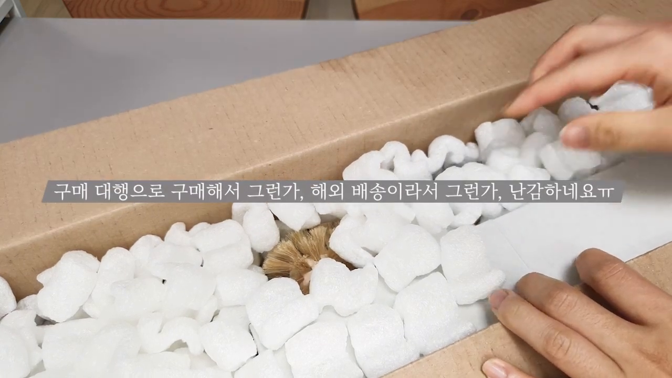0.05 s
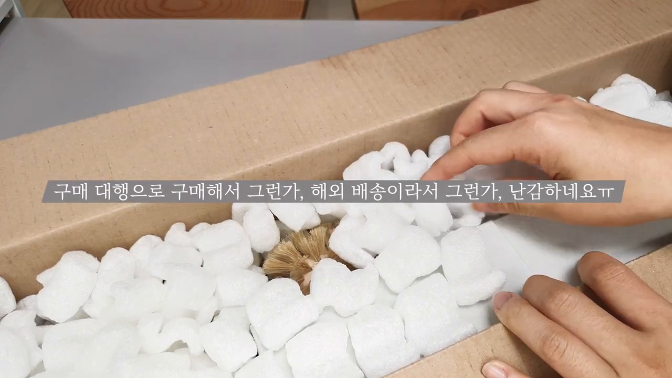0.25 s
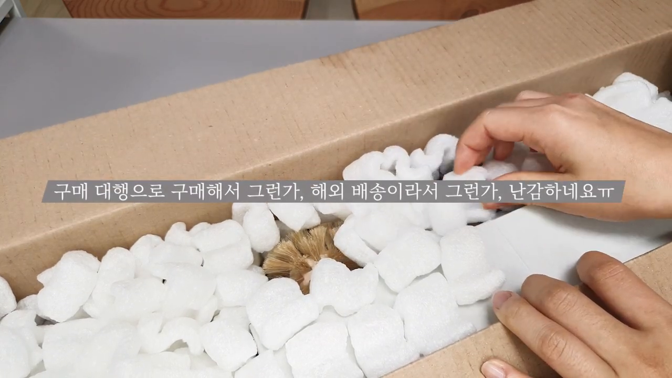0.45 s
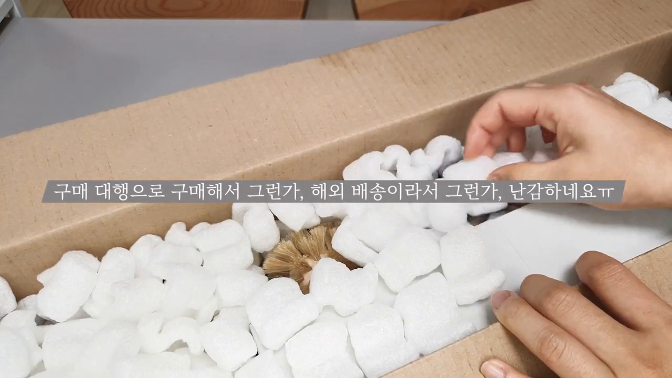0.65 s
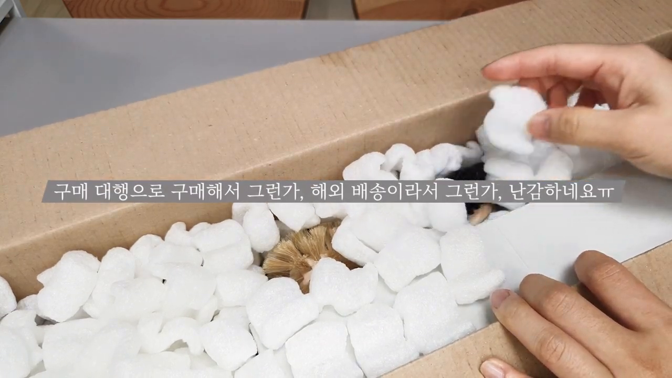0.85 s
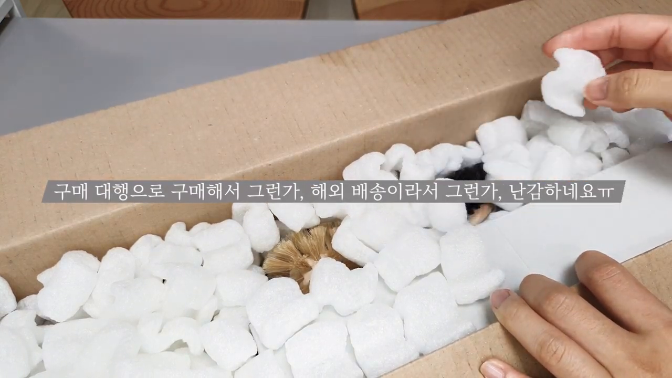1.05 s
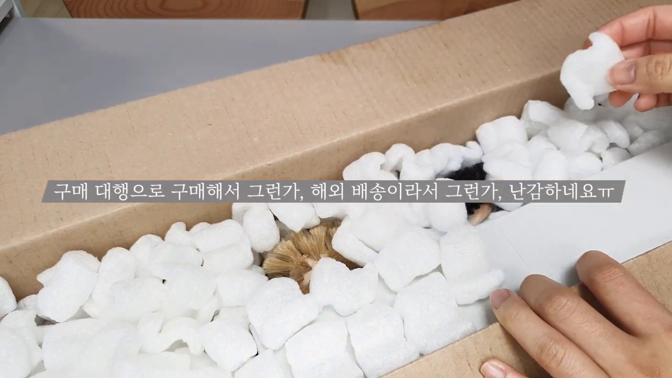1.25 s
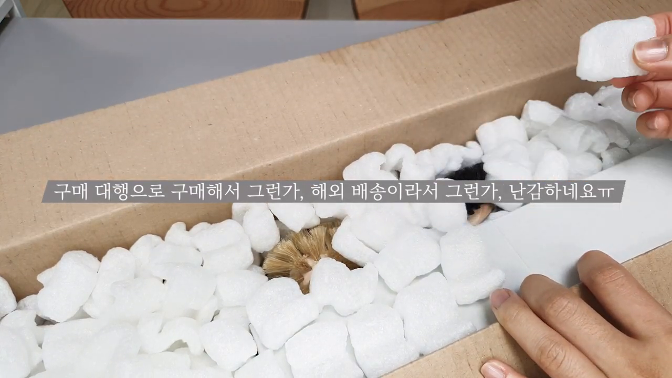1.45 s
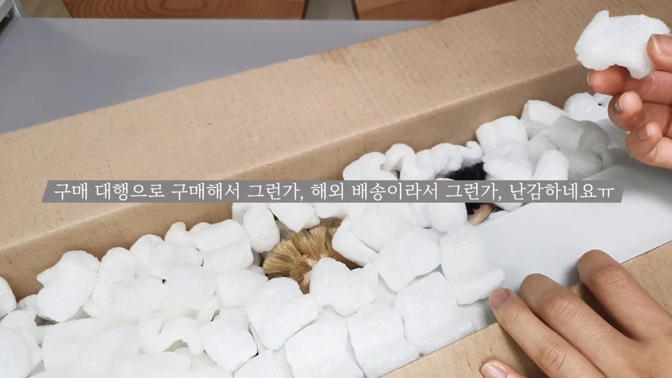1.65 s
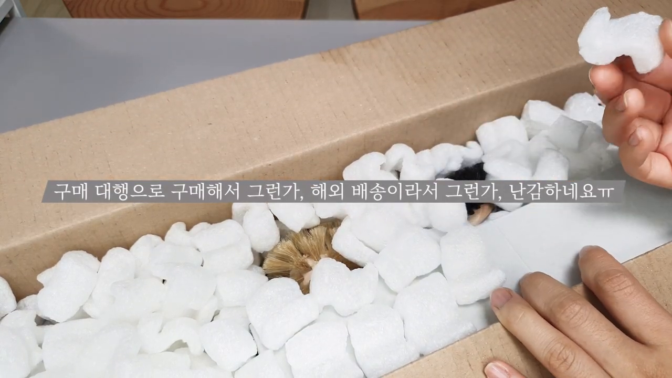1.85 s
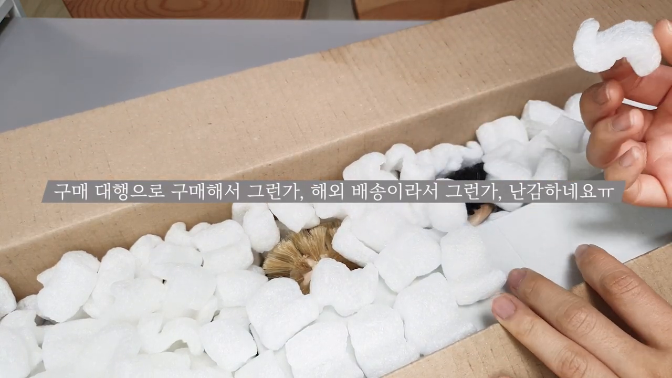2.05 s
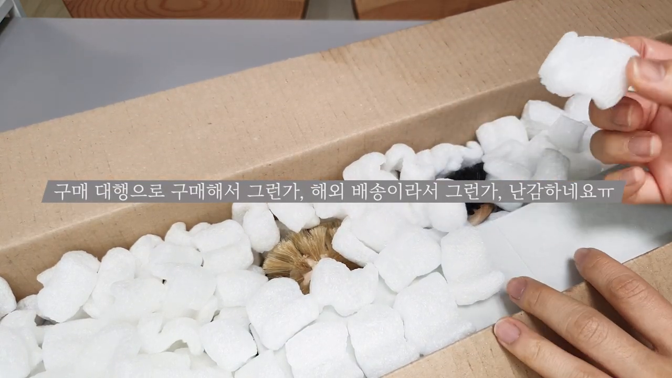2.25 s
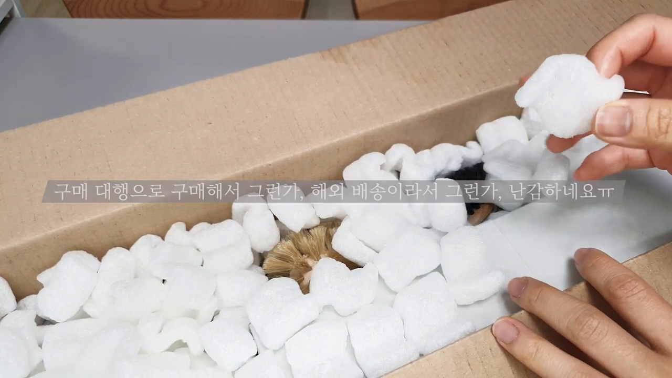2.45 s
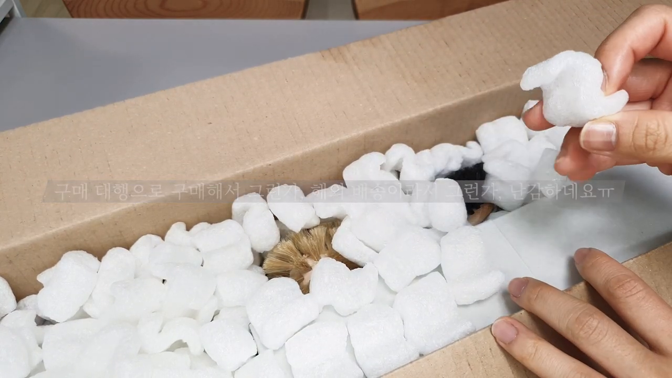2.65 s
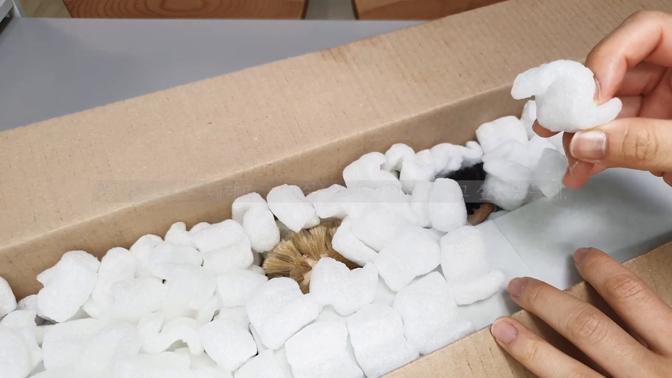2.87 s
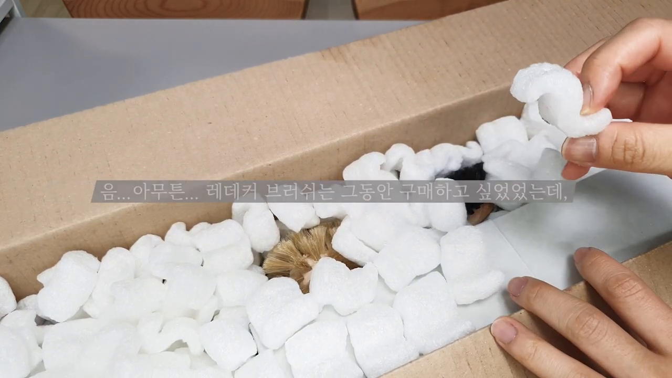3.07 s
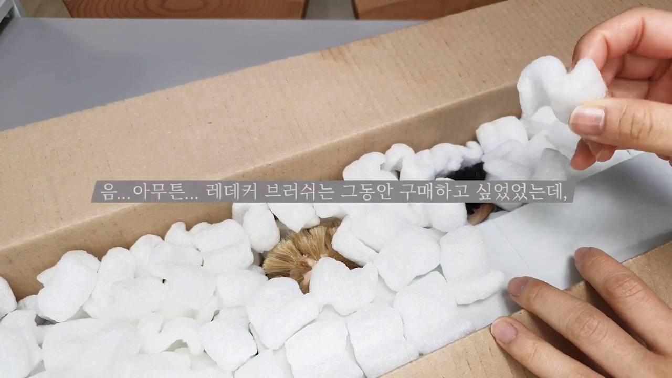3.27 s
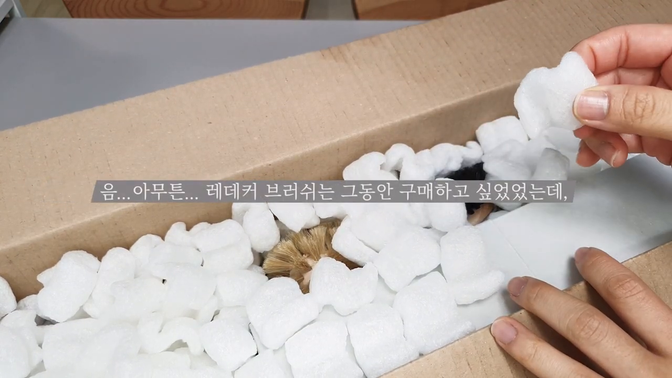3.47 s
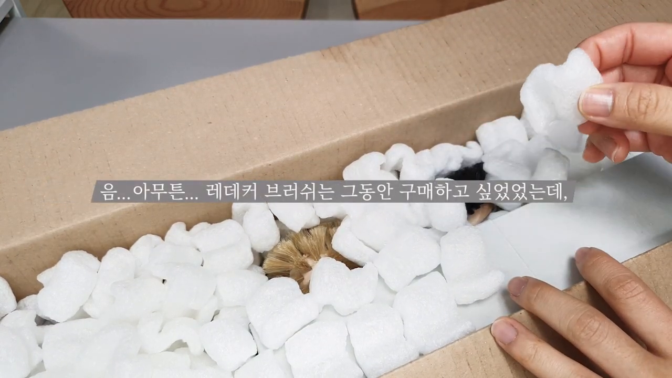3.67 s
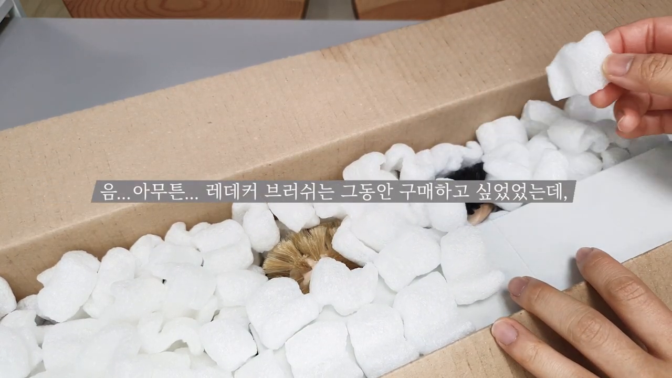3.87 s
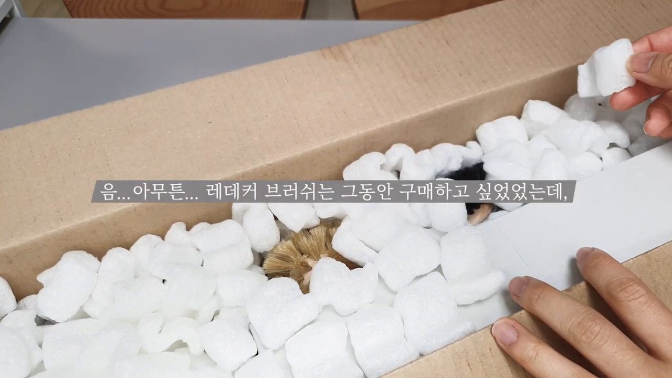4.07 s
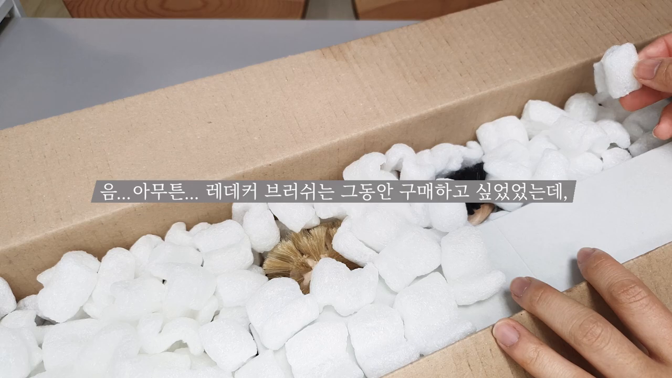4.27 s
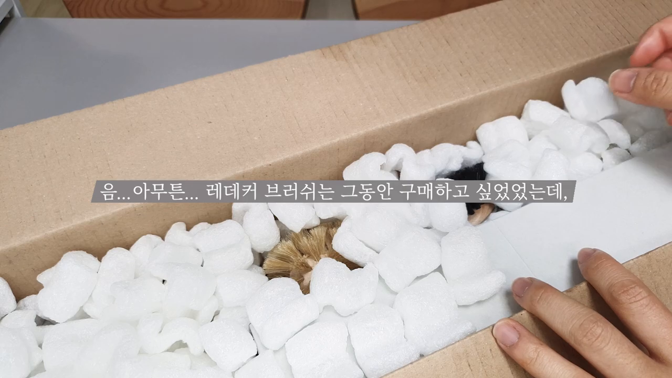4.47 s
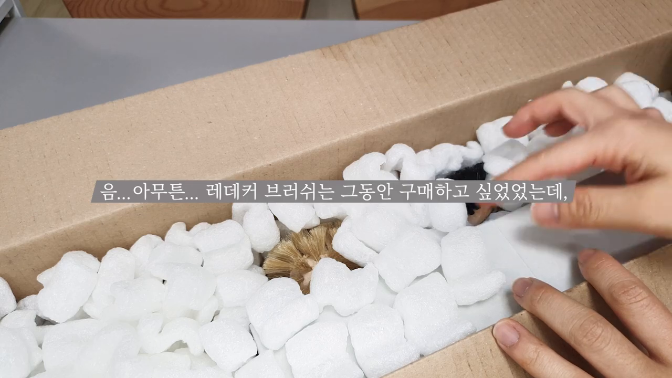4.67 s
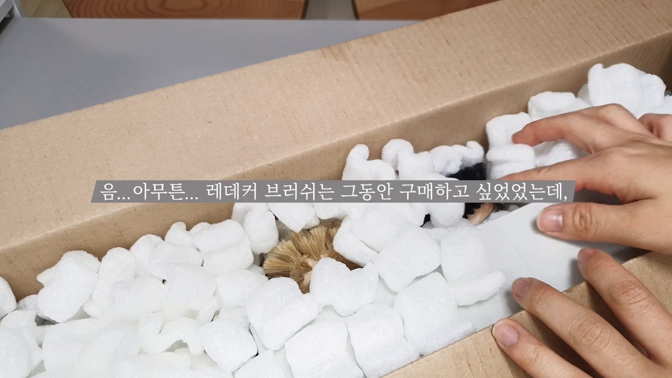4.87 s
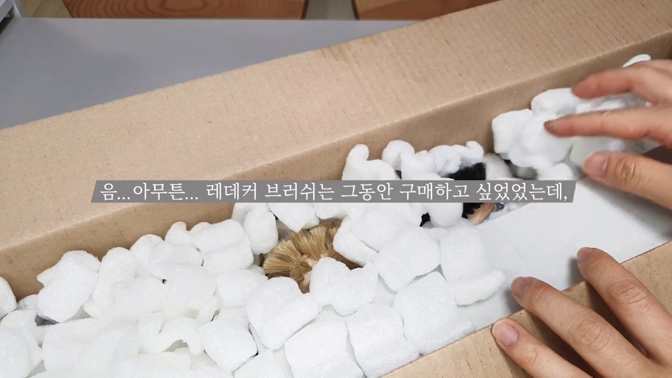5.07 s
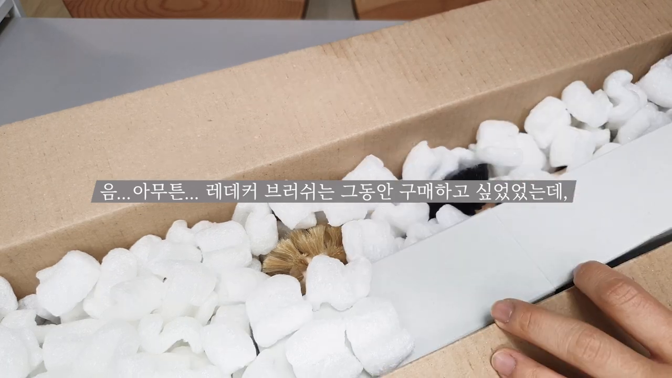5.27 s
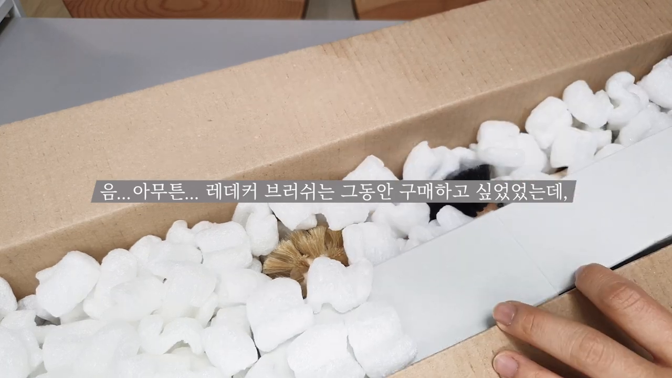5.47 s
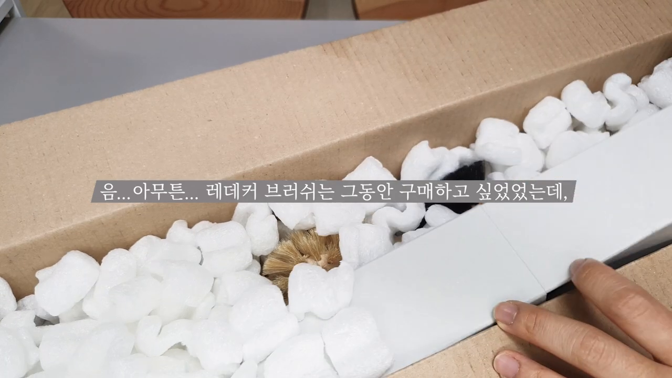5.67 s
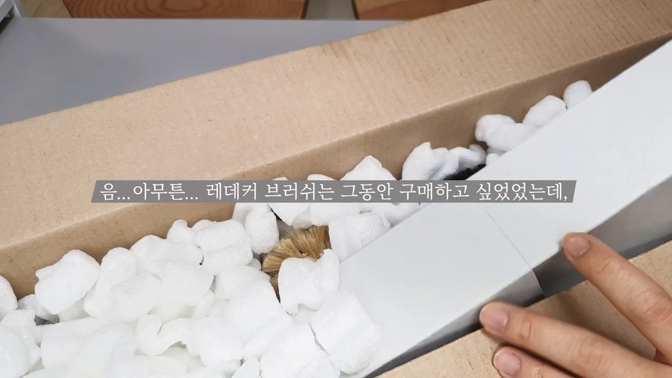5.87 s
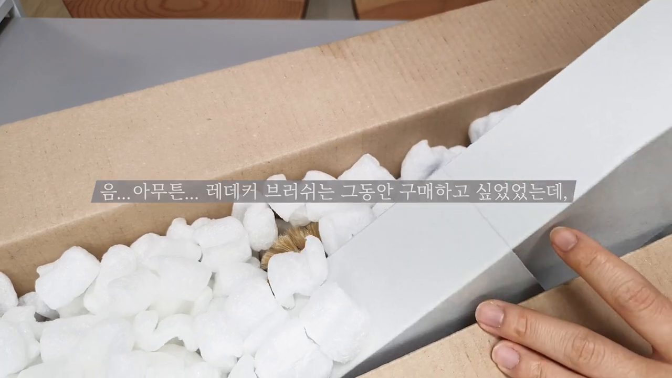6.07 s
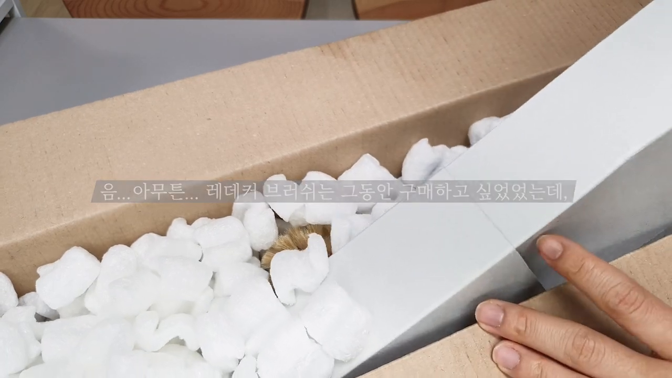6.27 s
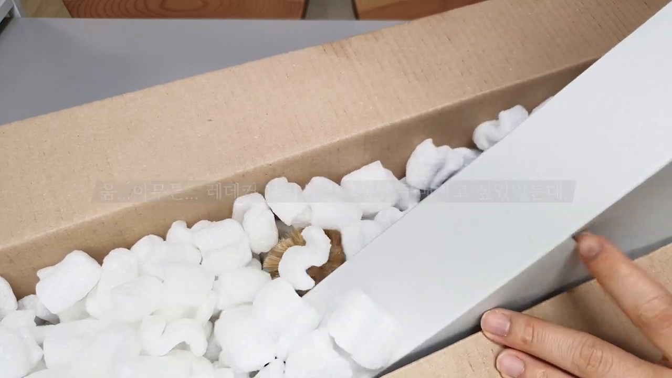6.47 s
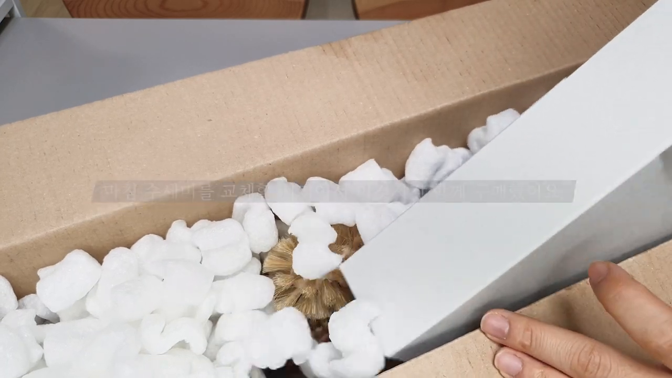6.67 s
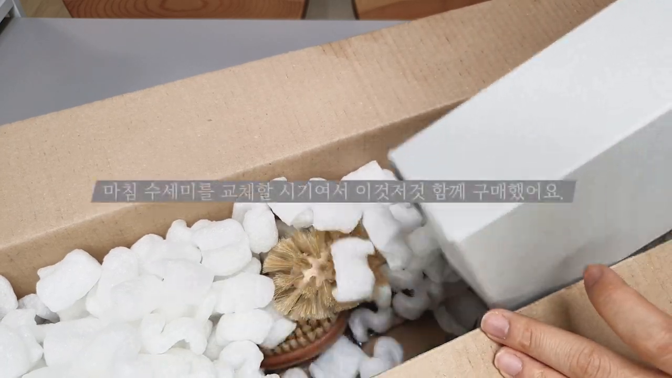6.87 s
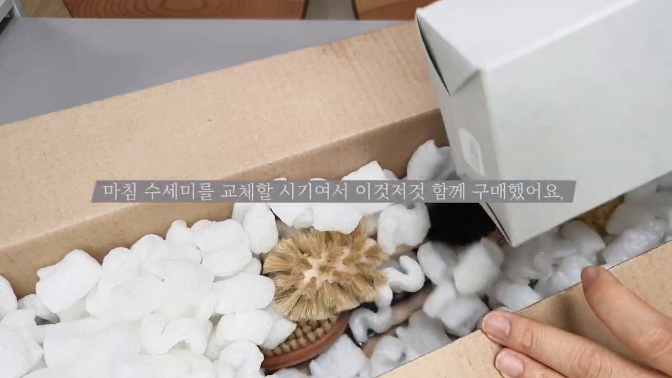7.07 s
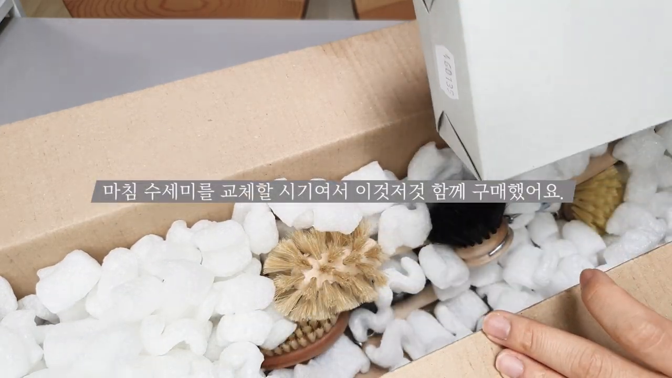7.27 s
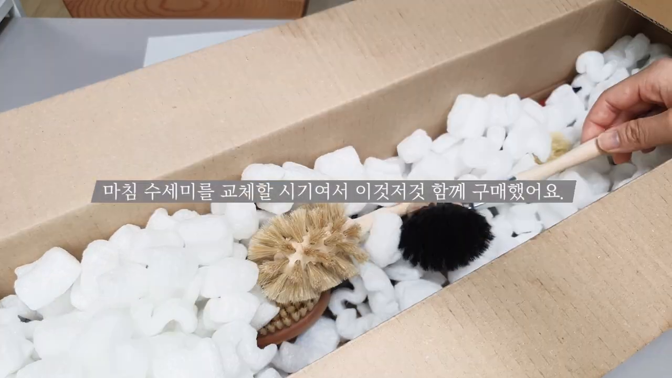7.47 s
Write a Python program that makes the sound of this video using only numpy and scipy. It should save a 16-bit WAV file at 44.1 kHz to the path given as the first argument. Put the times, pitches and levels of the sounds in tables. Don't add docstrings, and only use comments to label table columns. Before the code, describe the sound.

Close stereo pickup of unpacking indoors: a short burst of crunchy foam squeaks, then a long near-quiet passage with delicate finger rubs and isolated clicks over soft motor hum. A stronger stretch follows, with foam grinding, cardboard sliding, sharp knocks and low box thuds as a carton is pulled free. Loose light rattles and a final abrupt bump close it, with little reverberation.

```python
import sys
import numpy as np
from scipy import signal
from scipy.fft import rfft, irfft, next_fast_len
from scipy.io import wavfile
from scipy.ndimage import uniform_filter1d, map_coordinates

SR = 44100
rng = np.random.default_rng(int(sys.argv[2]) if len(sys.argv) > 2 else 0)


def amplitude_ratio(level_db):
    exponent = np.asarray(level_db, float) / 20
    return 10 ** exponent


def log_audio(samples):
    frames = np.atleast_2d(samples).T
    limited = np.clip(frames, -1, 1)
    pcm = np.round(limited * 32767).astype(np.int16)
    wavfile.write(sys.argv[1], SR, pcm)


N = 332065
T = np.arange(N) / SR


def unit(x):
    return x / np.sqrt(np.mean(x ** 2) + 1e-20)


def along(points, hz):
    f, v = np.transpose(points)
    return np.interp(np.log(hz + 1), np.log(f + 1), v)


def wobble(rate):
    return map_coordinates(rng.standard_normal(int(N * rate / SR) + 4), [T * rate])


def filtered(x, response):
    m = next_fast_len(N + SR // 2)
    return irfft(rfft(x, m) * response(np.fft.rfftfreq(m, 1 / SR)), m)[..., :N]


def coloured(spectrum):
    return lambda hz: amplitude_ratio(along(spectrum, hz))


def resonant(modes):
    def response(f):
        total = 0
        for k, (centre, width, db) in enumerate(modes):
            damping = 1j * f * width
            total = total + (-1) ** k * amplitude_ratio(db) * damping / (centre * centre - f * f + damping)
        return total
    return response


# f/Hz, left-right coherence [0 to 1]
COHERENCE = [(60, 0.8), (250, 0.87), (600, 0.37), (1500, 0.052), (4000, 0.089), (10000, 0)]


def stereo(pair, response):
    def turn(hz):
        return np.arccos(np.clip(along(COHERENCE, hz), -1, 1)) / 2
    mid, side = filtered(pair, lambda hz: response(hz) * [np.cos(turn(hz)), np.sin(turn(hz))])
    return unit(np.array([mid + side, mid - side]))


def rubbing(bed, response, per_second, centre_hz, cycles, grit):
    at = np.flatnonzero(rng.random(N) < per_second / SR * amplitude_ratio(4 * wobble(25)))
    draw = rng.standard_normal((len(at), 3))
    hz = np.clip(centre_hz * np.exp(0.404 * draw[:, :1]), centre_hz / 2, SR / 3)
    k = np.arange(int(1.9 * cycles * SR / centre_hz))
    turns = hz * k / SR
    ring = amplitude_ratio(8.5 * np.clip(draw[:, 1:2], -2, 2) - 40 * turns / cycles) * np.sin(2 * np.pi * turns)
    where = (at[:, None] + k).ravel()
    slips = []
    for gain in (np.ones(len(at)), np.tanh(draw[:, 2])):
        lane = np.bincount(where, (ring * gain[:, None]).ravel(), N + len(k))[:N]
        slips.append(unit(lane))
    return stereo(bed + grit * np.array(slips), response)


def patchy(depth_db):
    z = signal.stft(rng.standard_normal((2, N)), nperseg=512)[2]
    field = uniform_filter1d(rng.standard_normal(z.shape[1:]), size=2, axis=0)
    field = uniform_filter1d(field, size=5, axis=1)
    return unit(signal.istft(z * amplitude_ratio(depth_db * unit(field)), nperseg=512)[1][:, :N])


def strokes(rows, rise, fall, settle_db, settle_fall):
    s, hold, db = np.array(rows)[:, :3, None].transpose(1, 0, 2)
    t = T[::64]
    after = np.maximum(t - s - abs(hold), 0)
    return db - rise * np.maximum(s - t, 0) + np.maximum(-fall * after, settle_db - settle_fall * after)


def loudest(levels_db):
    return np.interp(T, T[::64], np.max(levels_db, axis=0))


def sides(pan_db):
    return amplitude_ratio(np.array([pan_db, -pan_db]) / 2)


def add(track, s, sound, pan_db=0):
    at = round(s * SR)
    for lane, late, gain in zip(track, (4, 0), sides(pan_db)):
        lane[at + late:][:len(sound)] += gain * sound


def knocks(rows, lift_db, puff_db, cycles):
    out, t = np.zeros((2, N + SR)), np.arange(SR // 8) / SR
    for s, db, hz, t60 in rows:
        band = signal.butter(2, [1.2 * hz / SR, 5 * hz / SR], 'band')
        puff = unit(signal.lfilter(*band, rng.standard_normal(len(t))))
        tone = np.sin(2 * np.pi * hz * t) + amplitude_ratio(puff_db) * puff
        onset = 1 - np.exp(-t * hz / cycles)
        add(out, s, amplitude_ratio(db + lift_db - 60 * t / max(t60, .005)) * onset * tone)
    return out[:, :N]


# multiple of the shaft rate, level/dB rms
MOTOR_ORDERS = [(1, -63), (4, -76), (5, -76.5), (10, -84.5)]
# f/Hz, level/dB rms
MAINS_LINES = [(120, -75.5), (360, -80.5), (513, -82.5), (900, -86.5)]
# f/Hz, level/dB per Hz
AIR_SPECTRUM = [(13, -65), (22, 12), (49, -5), (87, -2.5), (407, -9.5), (766, -25), (903, -27), (1400, -31),
                (2720, -22.5), (3880, -28), (8390, -31.5), (9370, -45), (15800, -37)]


def appliance():
    shaft_hz = 40.9 * (1 + 0.0023 * wobble(1.895))
    turns = np.cumsum(shaft_hz) / SR
    motor = sum(amplitude_ratio(db + 4.5) * np.sin(2 * np.pi * (k * turns + rng.random())) for k, db in MOTOR_ORDERS)
    mains = sum(amplitude_ratio(db + 3.5) * np.sin(2 * np.pi * (hz * T + rng.random())) for hz, db in MAINS_LINES)
    air = amplitude_ratio(-64) * stereo(rng.standard_normal((2, N)), coloured(AIR_SPECTRUM))
    return amplitude_ratio(2.2 * wobble(3.0)) * motor + amplitude_ratio(1.4 * wobble(1.84)) * mains + air


# t/s, hold/s, level/dB
SLEEVE_BRUSHES = [
    (0, 0.024, -52.5),
    (1.47, 0.22, -60.5),
    (2.15, 0.2, -62.5),
    (4.5, 0.05, -63.5),
    (5.22, 0.087, -54.5),
    (7.51, .03, -63),
]
# f/Hz, level/dB per Hz
SLEEVE_SPECTRUM = [(150, 5), (350, 5), (700, -2), (1500, -5), (2500, -25.5)]


def sleeve(smooth):
    brush = strokes(SLEEVE_BRUSHES, rise=205, fall=118, settle_db=-3.5, settle_fall=31)
    level_db = np.maximum(loudest(brush), -69)
    return amplitude_ratio(level_db) * stereo(np.flip(smooth, 1), coloured(SLEEVE_SPECTRUM))


# t/s, hold/s, level/dB
FOREARM_JOLTS = [
    (.86, 0.067, -56),
    (4.6, 0.041, -64.5),
    (4.9, 0.045, -52.5),
    (5.21, 0.019, -51.5),
    (5.69, 0.025, -52.5),
    (6.52, 0.24, -61.5),
    (7.51, .03, -54),
]
# f/Hz, width/Hz, level/dB
TABLE_MODES = [(68.3, 27, -0.5), (83.3, 26, 0.5)]


def table():
    jolt = strokes(FOREARM_JOLTS, rise=252, fall=148, settle_db=-13, settle_fall=13)
    level_db = np.maximum(loudest(jolt), -74)
    modes = resonant(TABLE_MODES)
    return amplitude_ratio(level_db) * stereo(rng.standard_normal((2, N)), lambda hz: modes(hz) ** 2)


# f/Hz, width/Hz, level/dB
FADING_MODES = [(2600, 520, 0)]


def fading_band(rough, settle_db):
    return amplitude_ratio(settle_db) * stereo(rough, resonant(FADING_MODES))


# t/s, level/dB peak, f/Hz, t60/s
BOX_BUMPS = [(.02, -47.5, 150, 0.096), (1.06, -48, 330, 0.028), (2.131, -44, 150, 0.045),
             (4.887, -38.5, 101, 0.086), (4.897, -42.5, 282, 0.11), (5.473, -37.5, 255, 0.057),
             (5.625, -45, 280, 0.077), (5.675, -24, 111, 0.048), (5.675, -34, 143, 0.043),
             (5.982, -25.5, 1460, 0.018), (6.06, -34.5, 308, 0.022), (6.128, -30, 241, 0.038),
             (6.49, -50, 373, 0.11), (6.612, -36, 333, 0.073), (6.666, -35, 342, 0.052),
             (6.63, -46.5, 151, 0.15), (6.93, -44, 150, 0.15), (7.005, -39, 134, 0.097),
             (7.246, -39, 189, 0.072), (7.5068, -31, 240, 0.03), (7.51, -29, 185, 0.15),
             (7.5105, -29, 287, 0.085), (7.514, -24, 75, 0.099), (7.5185, -23.5, 160, .05),
             (7.512, -37, 396, 0.064)]


def bumps():
    return knocks(BOX_BUMPS, lift_db=3.5, puff_db=-7.0, cycles=0.41)


# t/s, hold/s, effort level/dB
HAND_DIGS = [
    (.414, 0.083, -53.5),
    (.49, 0.16, -49.5),
    (.688, 0.012, -43),
    (.73, 0.12, -50.5),
    (.865, 0.03, -50.5),
    (1.012, 0.044, -57.5),
    (1.47, 0.14, -64),
]


def digging():
    return strokes(HAND_DIGS, rise=1801.5, fall=500, settle_db=-4, settle_fall=118)


# f/Hz, width/Hz, level/dB
FOAM_MODES = [(1600, 950, -12.5), (2750, 710, -3), (3570, 720, -1.5), (4290, 1060, -3), (5690, 1730, -9)]


def foam(level_db, jerk, rough):
    modes = resonant(FOAM_MODES)
    rub = amplitude_ratio(level_db + jerk) * rubbing(rough, modes, 700, 2955, cycles=24, grit=0.22)
    bursts = amplitude_ratio(level_db - 12) * rubbing(0, modes, 260, 3440, cycles=1.8, grit=1)
    return rub + bursts


# f/Hz, level/dB per Hz
SKIN_SPECTRUM = [(2500, -40), (5000, -8.5), (6800, -6), (8400, -9.5), (9300, -18.5), (12000, -15),
                 (15500, -18)]


def skin(level_db, jerk, smooth):
    flutter = 1.2 * jerk + 0.94 * wobble(90)
    rub = rubbing(smooth, coloured(SKIN_SPECTRUM), 1000, 7300, cycles=4.6, grit=0.36)
    return amplitude_ratio(level_db + flutter) * rub


# f/Hz, width/Hz, level/dB
CARD_MODES = [(546, 475, -0.5), (1250, 123, 3.5), (1500, 370, -2.5)]


def card(level_db, jerk, rough):
    rub = rubbing(np.flip(rough, 1), resonant(CARD_MODES), 200, 1060, cycles=4.4, grit=0.093)
    return amplitude_ratio(level_db + jerk) * rub


# f/Hz, width/Hz, level/dB
BOX_MODES = [(150, 59, -0.5), (280, 140, 2.5), (415, 234, 1)]


def box(level_db, smooth):
    return amplitude_ratio(level_db) * stereo(smooth, resonant(BOX_MODES))


# t/s, level/dB peak, f/Hz, left-right level/dB
FOAM_SLIPS = [(0.4233, -47.5, 5140, 11), (0.546, -44, 3040, 9), (0.479, -39.5, 2910, 3),
              (0.608, -56, 11000, 5), (0.617, -49, 3600, 1), (0.669, -39, 1780, -3),
              (0.669, -33, 5960, 3), (0.6816, -36.5, 2470, 3), (0.6826, -42, 5000, 2),
              (0.692, -34, 3470, 4), (0.695, -38.5, 2000, 1), (0.707, -37.5, 3450, 1),
              (0.724, -42, 2500, 5), (0.804, -47, 3300, 6), (0.819, -44.5, 7140, 12),
              (0.8879, -59, 2570, -1.5), (0.889, -50, 6000, 7), (0.9426, -60, 8900, 3),
              (1.014, -56, 3000, 16), (1.0624, -46, 7000, 2), (1.1057, -71, 11000, 0),
              (1.2835, -50, 2880, 5), (1.3, -48, 3300, 5), (1.306, -52, 2920, 3), (1.573, -54, 5500, 5),
              (1.394, -63, 3050, 5), (1.716, -60, 2470, -14), (2.475, -79, 9000, 1),
              (2.5412, -43, 3520, 12), (2.545, -38.5, 3330, -14), (2.5516, -33.5, 3550, 5),
              (2.555, -34.5, 3270, 1), (2.74, -54, 3840, -2), (2.891, -52, 2660, 8),
              (3.269, -40.5, 2750, -2), (3.366, -53, 2700, 1), (3.386, -53, 7640, 1),
              (3.875, -46, 2800, 12), (3.881, -45, 4150, 7), (4.4072, -63, 2970, 12),
              (4.5185, -62, 5400, 8), (4.788, -57.5, 2760, 9),
              (4.8853, -55, 1900, 0), (4.898, -50, 2860, 6), (4.9434, -39.5, 4800, 6),
                (4.95, -41, 2830, 3.5), (4.997, -49, 1840, -2), (5.061, -39, 3130, 2),
                (5.107, -34.5, 3260, 2), (5.9325, -34, 1530, -2), (5.94, -36, 3270, 3),
                (5.9328, -36, 3700, 10), (6.004, -37, 4600, 13), (5.974, -27.5, 3170, 6.5),
                (5.981, -32, 3100, 6), (6.172, -50.5, 4800, 16), (6.929, -49, 2920, 13),
                (6.9917, -44, 7000, 5), (7.008, -39, 2460, -13), (7.0465, -51.5, 6760, 15),
                (7.154, -54, 5500, 12), (7.193, -57, 3030, 3), (7.205, -57, 2220, -2),
                (7.223, -47, 4600, 13.5), (7.24, -49, 1610, 19), (7.28, -54, 3000, 2),
                (7.297, -50, 2500, 0), (7.292, -50.5, 2930, 16), (7.3183, -50, 2430, 10),
                (7.367, -59, 2550, 19)]


def ticks():
    ring, crack, spit = np.zeros((3, 2, N + SR))
    t = np.arange(SR // 50) / SR
    ring_s, crack_s = .007, .009
    onset = 1 - np.exp(-t / 0.00047)
    for s, db, hz, pan_db in FOAM_SLIPS:
        noise = rng.standard_normal((2, len(t)))
        spit_db = -36.5 + 0.59 * (db + 38.0) + 7.5 * np.log2(hz / 3000)
        add(ring, s, amplitude_ratio(db + 11.5 - 60 * t / ring_s) * onset * np.sin(2 * np.pi * hz * t), pan_db)
        add(crack, s, amplitude_ratio(db + 13.5 - 60 * t / crack_s) * noise[0], pan_db)
        add(spit, s, amplitude_ratio(spit_db - 60 * t / crack_s) * noise[1], pan_db)
    cracks = filtered(crack[:, :N], resonant(FOAM_MODES))
    return ring[:, :N] + cracks + filtered(spit[:, :N], coloured(SKIN_SPECTRUM))


# t/s, level/dB peak, f/Hz
CARD_TAPS = [(0.425, -40, 1350), (0.684, -46, 890), (0.697, -42, 1280), (0.865, -39, 1250),
             (0.924, -41.5, 420), (1.012, -47, 790), (1.283, -45, 1700), (2.129, -38.5, 1050),
             (2.13, -41.5, 2060), (2.1305, -46, 538), (3.876, -38, 1600), (4.517, -50, 910),
             (4.886, -39, 472), (4.8975, -36.5, 496), (5.032, -29, 570), (5.474, -36.5, 438),
             (5.624, -41, 465), (5.674, -31.5, 1100), (5.974, -23.5, 492), (5.982, -22.5, 569),
             (6.126, -38, 636), (6.487, -38, 520), (6.612, -39, 690), (6.783, -28.5, 664),
             (6.881, -26, 1150), (6.958, -28.5, 685), (7.152, -41, 1600), (7.171, -29, 1690),
             (7.243, -19.5, 687), (7.244, -26, 1500), (7.293, -32.5, 717), (7.341, -38, 1650),
             (7.363, -40.5, 707), (7.511, -25, 540), (7.512, -42, 845), (7.516, -27, 554),
             (7.524, -26, 503),
             (7.154, -42.5, 690), (7.188, -44, 1600), (7.194, -40.5, 694), (7.2385, -43, 1350),
                 (7.248, -31, 750), (7.257, -39, 687), (7.257, -49, 1530), (7.263, -42, 507),
                 (7.279, -36, 710), (7.305, -49, 704), (7.35, -46, 402), (7.41, -49.5, 1000)]


def taps():
    rows = []
    for s, db, hz in CARD_TAPS:
        t60 = 0.021 * (1000 / hz) ** 0.78
        rows.append((s, db, hz, t60))
    return knocks(rows, lift_db=-1.0, puff_db=-12, cycles=1.0)


# t/s, length/s, level/dB, f/Hz
FRICTION_STREAKS = [(0.425, 0.045, -64, 1470), (.477, 0.037, -56, 1470), (0.681, 0.018, -54, 1510),
                    (0.485, 0.022, -56, 3500), (.533, 0.029, -64, 6940), (.533, .024, -68, 5800),
                    (0.557, 0.071, -60, 1540), (.604, .016, -60, 6700), (0.683, 0.028, -52, 2580),
                    (0.686, 0.023, -56, 3440), (0.672, 0.028, -49, 6540), (3.875, 0.064, -71, 1600),
                    (3.876, .025, -57.5, 2750), (4.018, .025, -68.5, 3700), (4.052, 0.028, -77, 1720),
                    (4.045, .03, -72, 2870), (4.994, 0.027, -61, 1870), (5.11, 0.055, -56, 1680),
                    (5.133, 0.019, -51.5, 3050), (5.167, 0.041, -72, 1400), (5.244, .045, -65, 1500),
                    (5.259, 0.053, -58.5, 905), (5.375, 0.029, -52.5, 394), (5.378, 0.043, -61.5, 1960),
                    (5.437, .02, -68, 1750), (5.53, 0.027, -64, 2350), (5.63, 0.038, -61.5, 1500),
                    (5.75, 0.049, -55.5, 1050), (5.77, .09, -56, 2900), (5.86, 0.07, -53.5, 1440),
                    (5.945, 0.096, -53, 557), (5.993, 0.042, -52, 1350), (6.485, 0.023, -56, 1520),
                    (6.489, 0.027, -57, 475), (6.544, 0.024, -59, 1250), (6.559, 0.029, -58, 2900),
                    (6.62, 0.026, -56, 1290), (6.645, .024, -54, 1350), (6.646, .03, -51.5, 2600),
                    (6.657, 0.029, -61, 4870), (6.692, 0.05, -61.5, 1200), (6.737, 0.049, -52, 645),
                    (6.754, 0.042, -56, 1830), (6.75, .05, -57, 3600), (6.781, 0.045, -54, 2880),
                    (6.813, 0.078, -60, 2630), (6.82, .06, -56, 3300), (6.897, 0.014, -48.5, 686),
                    (6.94, 0.051, -54, 690), (7.002, .028, -53.5, 2420),
                    (1.281, .01, -54.5, 3540), (1.28, .01, -57, 6840), (1.279, 0.0097, -62.5, 1680),
                (1.464, 0.047, -67.5, 1750), (1.589, 0.037, -67, 1600), (1.61, .045, -65, 2190),
                (1.76, 0.21, -79, 1320), (2.528, .012, -48, 3520), (2.67, .035, -76, 1390),
                (2.736, .045, -64, 3770), (2.83, .02, -70, 2230), (2.829, .015, -62, 3800),
                (2.872, .03, -62.5, 2700)]


def streaks():
    out = np.zeros((2, N + SR))
    for s, length, db, hz in FRICTION_STREAKS:
        u = np.arange(round(length * SR)) / (length * SR)
        width_hz = 260 * (hz / 1000) ** 0.39
        peak = signal.iirpeak(hz, hz / width_hz, SR)
        once = signal.lfilter(*peak, rng.standard_normal(SR // 4))
        band = signal.lfilter(*peak, once)[-len(u):]
        swell = np.sqrt(np.minimum(4 * np.minimum(u, 1 - u), 1))
        add(out, s, amplitude_ratio(db + 4.0) * swell * unit(band))
    return out[:, :N]


# t/s, length/s, level/dB, f/Hz
PITCHED_SQUEAKS = [(0.471, 0.044, -59.5, 1120), (2.282, 0.11, -72.5, 1944), (3.886, 0.075, -61, 2900),
                   (4.025, 0.067, -81, 1734), (5.26, 0.066, -59.5, 1402), (5.517, 0.062, -57, 3150),
                   (5.53, .045, -65, 3600), (5.926, 0.055, -50.5, 1500), (5.929, 0.086, -47, 3210),
                   (5.93, 0.08, -44.5, 4270), (6.82, 0.092, -59.5, 1250), (6.989, 0.033, -59, 2400)]


def squeaks():
    out = np.zeros((2, N + SR))
    for s, length, db, hz in PITCHED_SQUEAKS:
        u = np.arange(round(length * SR)) / (length * SR)
        drift, grip = uniform_filter1d(rng.standard_normal((2, SR // 4)), size=60, axis=1)[:, :len(u)]
        tone = np.sin(2 * np.pi * np.cumsum(hz * (1 + 0.487 * drift)) / SR)
        shape = np.minimum(8 * u, 1) * np.sqrt(1 - u)
        add(out, s, amplitude_ratio(db + 9 + 17 * grip) * shape * tone)
    return out[:, :N]


# t/s, hold/s, squeak level/dB, skin over squeak/dB
PEANUT_CATCHES = [(1.278, 0.009, -56.5, 0.5), (1.395, 0.0082, -59.5, 0), (1.714, 0.0058, -57.5, -3.5),
                  (1.792, 0.0091, -63.5, -6), (1.88, 0.0087, -64, -6), (2.003, 0.0076, -63.5, -3),
                  (2.068, 0.025, -66, -8), (2.238, 0.091, -67, 0), (2.53, 0.012, -51.5, -7),
                  (2.542, 0.013, -53, -4), (2.733, 0.059, -61.5, -1.5), (2.812, 0.026, -59, -0.5),
                  (2.866, 0.032, -62.5, -4), (3.008, .006, -68.5, 0), (3.026, 0.007, -62.5, -1),
                  (3.263, 0.0064, -68, -6), (3.39, 0.032, -63.5, -1.5), (3.875, 0.062, -58.5, -8.5),
                  (4.018, 0.055, -69.5, -2.5), (4.277, 0.014, -67, 6), (4.407, .008, -72, 6.5),
                  (4.518, 0.018, -66.5, -0.5), (4.788, 0.0047, -69, 2.5)]
# t/s, hold/s, squeak level/dB, skin over squeak/dB
FINGER_RUBS = [
    (1.633, 0.13, -65, -5),
    (2.288, 0.029, -62, 7.5),
    (2.93, 0.27, -73, 1),
    (3.316, 0.12, -70, 1),
    (3.467, 0.11, -73.5, 3.5),
    (3.625, 0.029, -67, -3),
    (4.138, 0.049, -78, 4),
    (6.942, 0.06, -63.5, 14.5),
]


def fingering():
    catches = strokes(PEANUT_CATCHES, rise=2500, fall=412, settle_db=-12, settle_fall=52)
    rubs = strokes(FINGER_RUBS, rise=259, fall=200, settle_db=-20, settle_fall=100)
    held = np.r_[catches, rubs]
    skin_over = np.array(PEANUT_CATCHES + FINGER_RUBS)[:, 3:]
    return loudest(held), loudest(held + skin_over)


# f/Hz, width/Hz, level/dB
PEANUT_MODES = [(1550, 1000, -5), (2910, 510, 3.5), (3660, 710, -3), (5280, 710, -0.5)]


def held_peanut(level_db, jerk, smooth):
    return amplitude_ratio(level_db + jerk) * stereo(smooth, resonant(PEANUT_MODES))


# t/s, hold/s, effort level/dB, card pressure over effort/dB
CARTON_DRAGS = [(4.906, 0.0059, -61, -2.5), (4.953, .04, -49, 0), (4.998, 0.15, -46.5, 0.5),
                (5.17, 0.1, -59, 6), (5.265, 0.065, -54, 6.5), (5.337, 0.026, -58.5, 5),
                (5.378, 0.095, -58, 7.5), (5.497, 0.022, -59.5, 7), (5.53, 0.043, -51.5, -1.5),
                (5.585, 0.035, -59.5, 1), (5.635, 0.22, -60.5, 9.5), (5.731, .03, -53.5, 9.5),
                (5.766, 0.15, -47.5, 5), (5.926, 0.023, -46.5, 2), (5.963, 0.026, -42.5, 7),
                (6.007, 0.043, -45.5, 1.5), (6.108, 0.091, -52, 2), (6.222, 0.21, -59, 2.5),
                (6.483, 0.15, -51, 3.5), (6.615, 0.072, -47.5, 2.5), (6.7, 0.042, -48, 3.5),
                (6.732, 0.062, -48, 1), (6.796, 0.054, -55, 8), (6.882, 0.016, -53, 10),
                (6.94, 0.029, -53, 9), (6.99, 0.025, -49, 1), (7.145, 0.058, -58.5, -0.5),
                (7.247, 0.0055, -55, 4.5), (7.281, 0.034, -62.5, 8.5), (7.344, 0.048, -62.5, 1.5),
                (7.413, 0.14, -68, -1)]


def dragging():
    drag = strokes(CARTON_DRAGS, rise=404, fall=450, settle_db=-7.5, settle_fall=107)
    return drag, drag + np.array(CARTON_DRAGS)[:, 3:]


# t/s, left-right level/dB
HAND_PLACE = [
    (0, -4),
    (.75, -1.5),
    (4.7, -2.5),
    (6.35, 0.5),
    (7, -2),
    (7.5, 0.5),
]


def rustle():
    dig = digging()
    drag, press = dragging()
    squeak_db, finger_db = fingering()
    settle_db = -55.5 - 48 * T
    finger_db = np.maximum(finger_db, settle_db - 11)
    foam_db = loudest(np.r_[dig - 1.5, drag - 1])
    skin_db = np.maximum(loudest(np.r_[dig - 1.5, drag - 5.5]), finger_db)
    card_db = loudest(np.r_[dig - 5, press - 2.5])
    shaken = -54.5 + .5 * (press + 50) - 120 * (press < -75)
    box_db = loudest(np.r_[dig - 8, shaken])

    jerk = 0.84 * wobble(40) + 0.75 * wobble(110)
    rough, smooth = patchy(depth_db=1.5), patchy(depth_db=2.5)
    hand = foam(foam_db, jerk, rough) + skin(skin_db, jerk, smooth) + card(card_db, jerk, rough)
    hand += held_peanut(squeak_db, jerk, smooth) + fading_band(rough, settle_db)
    pan_db = np.interp(T, *np.transpose(HAND_PLACE))
    return hand * sides(pan_db) + box(box_db, smooth) + table() + sleeve(smooth)


# f/Hz, t60/s
ROOM_DECAY = [(100, 0.14), (1000, 0.2), (10000, 0.031)]


def room(x):
    hz, t, z = signal.stft(rng.standard_normal((2, SR // 2)), SR, nperseg=256)
    decay = amplitude_ratio(-60 * t / along(ROOM_DECAY, hz)[:, None])
    tail = signal.istft(z * decay, SR, nperseg=256)[1]
    late = np.pad(x, ((0, 0), (150, 0)))
    return signal.fftconvolve(late, tail / np.linalg.norm(tail[0]), axes=1)[:, :N]


def scene():
    bed = appliance() + rustle()
    bump = bumps()
    bright = ticks() + streaks() + squeaks()
    tap = taps()
    echo = room(amplitude_ratio(-11) * bright + amplitude_ratio(-10.5) * tap + amplitude_ratio(-13.5) * bump)
    return bed + bright + tap + bump + echo


def band_limit(x):
    return signal.sosfilt(signal.butter(12, 15840, fs=SR, output="sos"), x)


# f/Hz, left-right level/dB
CAPSULE_TILT = [(60, 0), (150, 0.5), (380, -1), (950, 1.5), (2380, -0.5), (5980, 3.5), (15000, 4.5)]


def record(dry):
    def capsules(hz):
        bass_cut = np.clip(hz / 36, 0, 1) ** 4
        return sides(along(CAPSULE_TILT, hz)) * (hz < 15840) * bass_cut
    fade = np.clip((N / SR - T) / .0015, 0, 1)
    return band_limit(filtered(dry * fade, capsules))


dry = scene()
out = record(dry)
log_audio(out)
```